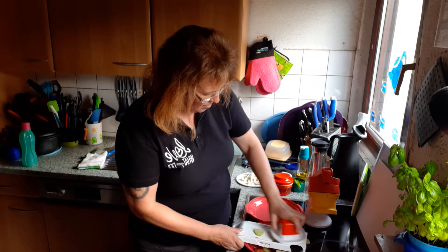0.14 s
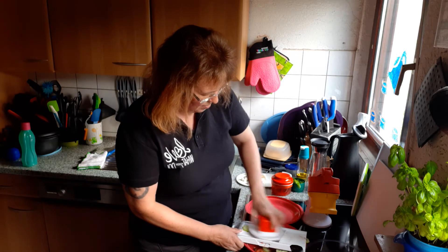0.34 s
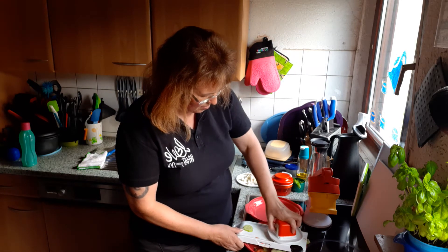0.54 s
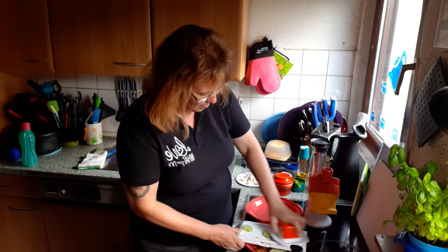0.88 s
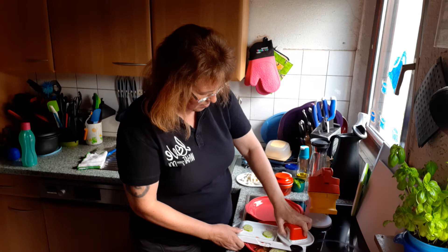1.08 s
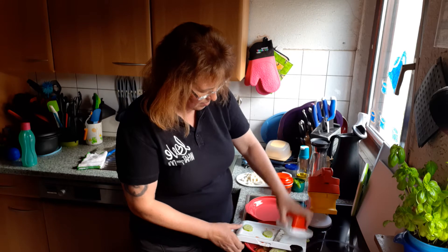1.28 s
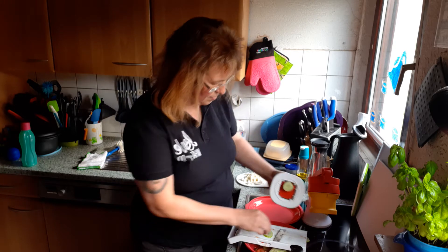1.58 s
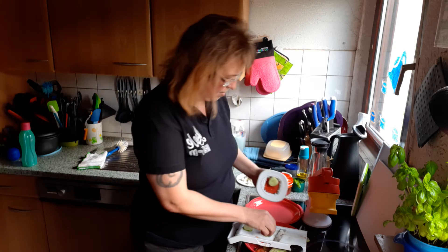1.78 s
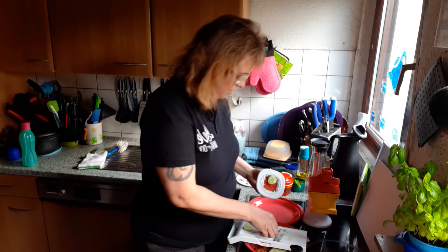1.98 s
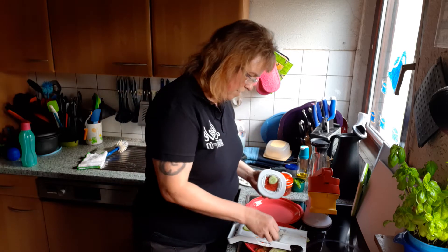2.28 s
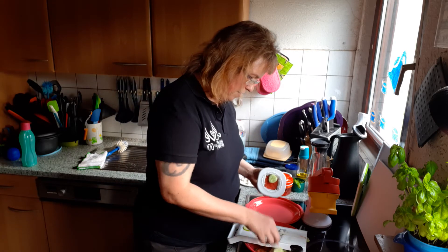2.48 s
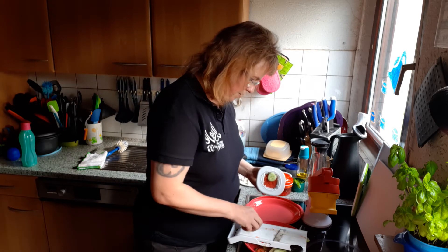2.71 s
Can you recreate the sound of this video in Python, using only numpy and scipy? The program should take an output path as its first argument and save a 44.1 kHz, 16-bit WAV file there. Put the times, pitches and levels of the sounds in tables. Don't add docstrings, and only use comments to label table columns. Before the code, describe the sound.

A vegetable in a plastic holder is pushed over a slicer in a burst of hard knocks, short scrapes and hollow worktop thumps, then scattered lighter clicks, close stereo in a small kitchen with faint low hum.

```python
import sys
import numpy as np
from scipy import signal
from scipy.fft import rfft, irfft, next_fast_len
from scipy.io import wavfile

SR = 44100
rng = np.random.default_rng(int(sys.argv[2]) if len(sys.argv) > 2 else 0)


def put_to_file(sound):
    columns = np.atleast_2d(sound).T
    safe = np.clip(columns, -1, 1)
    whole_steps = np.round(safe * 32767)
    wavfile.write(sys.argv[1], SR, whole_steps.astype(np.int16))


def how_loud(loudness_db):
    steps = np.asarray(loudness_db, float) / 20
    return 10 ** steps


N = 125685
T = np.arange(N) / SR
LEFT_RIGHT = np.array([[1], [-1]])

# [f/Hz, density/dB per Hz]; its level/dB
RUMBLE, RUMBLE_DB = [(25, -1.5), (48, -2.5), (110, -4), (160, -15), (230, -17), (400, -28), (1000, -56.5)], -68.5
# [f/Hz, density/dB per Hz]; its level/dB
HISS_COLOUR, HISS_DB = [(500, -11), (4300, -18.5), (8600, -26), (10100, -14), (10700, -8.5), (11400, 3),
                        (12100, -7.5), (15900, -12)], -75
# [f/Hz, level/dB]
WHINE_LINES = [(10928, -98.5), (10977, -102), (11224, -87.5), (11273, -87), (11321, -90), (11370, -91),
               (11466, -86.5), (11569, -91.5), (11617, -100)]
# [t/s, firing rate f/Hz, first, second, third order level/dB]
ENGINE_RUN = [(0.552, 62.19, -65, -72, -73.5), (.95, 62.34, -101, -61, -62.5),
              (1.22, 63.27, -77.5, -83, -69), (1.3, 63.92, -72.5, -72.5, -79.5),
              (1.403, 63.7, -78.5, -76.5, -68.5), (1.679, 64.35, -78.5, -80, -88),
              (2.029, 64.95, -72, -61, -81), (2.302, 66.38, -63, -63, -81.5), (2.409, 65.9, -84, -81, -80),
              (2.531, 66.5, -62.5, -74, -69), (2.599, 65.6, -63.5, -60, -96), (2.85, 64.8, -63, -53.5, -80)]
# [f/Hz, level when shaken/dB, t60/s, level when struck/dB]
WORKTOP_MODES = [(50.3, -3, 0.23, 0.5), (80.5, -4.5, 0.31, 0), (113, -7.5, 0.24, -6.5),
                 (150.6, -3.5, 0.19, 1.5), (219.8, -13, 0.36, -16.5), (259.8, -11.5, 0.13, -9),
                 (345.7, -7.5, 0.12, -5.5), (394, -11.5, 0.029, -20.5), (538, -17.5, 0.2, -13.5)]
# [f/Hz, level/dB, t60/s]
FRAME_MODES = [(820, -6.5, 0.08), (970.5, -1, 0.1), (1080, -0.5, 0.03), (1132, -3, 0.051),
               (1284, -1, 0.066), (1503, -6, 0.04), (1604, -11, 0.044), (1887, -4.5, 0.034),
               (2040, -7, 0.28), (2300, -31.5, .04), (2620, -20, 0.026)]
# [t/s, length/s, level/dB, f/Hz]
FINGER_THUDS = [
    (.124, 0.0083, -41, 152),
    (.141, 0.022, -41, 142),
    (0.331, 0.055, -42.5, 80.5),
    (.271, 0.011, -25.5, 147.6),
    (.2855, .008, -28, 141),
    (.3115, 0.0089, -28.5, 114.3),
    (.8375, 0.023, -42, 148.3),
    (2.4285, 0.025, -41, 146),
]
# [t/s, length/s, level/dB, f/Hz, t60/s]
HOLDER_CHATTERS = [(.0965, 0.0033, -50, 5890, 0.0078), (0.097, 0.025, -53, 853, 0.019),
                   (.125, 0.048, -52, 560, 0.011), (.2725, 0.023, -43, 577, 0.0074),
                   (.273, 0.0082, -43, 1914, 0.018), (0.41, 0.035, -52, 4000, .004),
                   (0.966, 0.16, -74, 5230, 0.0019), (1.177, .12, -82.5, 5000, 0.0027),
                   (1.452, 0.29, -88.5, 5430, 0.0015), (2.426, 0.055, -65.5, 346, 0.021),
                   (0.12, 0.016, -45.5, 1240, 0.032), (.149, 0.004, -43.5, 2240, 0.013),
                   (0.652, .09, -70.5, 1060, 0.047), (0.767, 0.026, -69.5, 2230, 0.0088),
                   (0.17, 0.0051, -51, 1160, 0.035), (0.237, 0.016, -37, 1164, 0.025),
                   (0.275, 0.014, -43.5, 963, 0.022), (.338, 0.006, -57, 1524, 0.048),
                   (0.398, .004, -57.5, 2070, 0.011), (0.846, 0.0055, -56, 1180, 0.013),
                   (0.886, 0.012, -57, 1026, 0.051), (1.131, 0.021, -67.5, 1626, 0.03),
                   (1.22, 0.038, -74.5, 996, .05), (1.726, 0.017, -60.5, 976, 0.064),
                   (1.725, 0.024, -73, 1530, 0.064), (1.767, 0.26, -74, 952, 0.31),
                   (1.911, 0.049, -72, 951, 0.078), (1.82, 0.0058, -70, 1980, 0.026),
                   (1.907, 0.046, -67, 1200, 0.025), (2.018, 0.013, -72.5, 920, 0.019),
                   (2.047, 0.012, -65, 897, 0.02), (2.05, 0.09, -85, 1490, 0.21),
                   (2.092, .015, -90, 950, 0.027), (2.428, 0.025, -64, 825, .03),
                   (2.433, 0.038, -69, 1430, 0.022), (2.442, 0.024, -68.5, 546, 0.026),
                   (2.724, 0.015, -50.5, 957, 0.02), (2.755, 0.0051, -71, 1910, 0.013),
                   (2.772, 0.023, -59.5, 940, 0.018)]
# [t/s, crack level/dB, frame level/dB, worktop level/dB, crack f/Hz]
HOLDER_KNOCKS = [(0.095, -53, -59, -45.5, 5800), (0.1213, -37, -36.5, -38, 2230),
                 (0.148, -34.5, -69, -40, 2200), (0.2336, -30, -48.5, -45, 1610),
                 (0.2708, -29.5, -29.5, -28, 4530), (0.286, -41, -43, -40, 4600),
                 (0.315, -50, -57, -44, 2420), (0.337, -44, -77, -59, 2130), (.432, -46, -66, -60.5, 4000),
                 (0.445, -43, -49.5, -57, 3940), (.466, -49, -63, -45, 3840),
                 (.8365, -39.5, -60, -42.5, 4170), (.886, -40, -49, -48, 4180),
                 (1.134, -47, -63, -60, 3750), (1.26, -61, -66.5, -81.5, 4000),
                 (1.721, -42, -54, -56.5, 4900), (1.821, -71, -55.5, -75, 2090),
                 (1.904, -44, -56.5, -61, 4630), (1.946, -72, -67, -56, 1980), (2.018, -53, -66, -67, 4200),
                 (2.0474, -45.5, -61, -57, 4300), (2.427, -48.5, -65, -42.5, 820),
                 (2.7283, -39, -45.5, -57.5, 10400), (2.76, -41, -67, -61.5, 4370)]
# [t/s, length/s, scrape level/dB, frame rattle level/dB, worktop push level/dB]
HOLDER_SLIDES = [(0.0, 0.013, -62.5, -76, -49.5), (0.087, 0.033, -55, -52, -46),
                 (0.122, 0.063, -47.5, -51.5, -35), (0.219, 0.015, -56.5, -59.5, -67),
                 (0.2335, 0.012, -52, -44.5, -55), (0.246, 0.035, -42, -45, -24),
                 (0.307, 0.064, -63, -75, -32.5), (0.395, 0.034, -52.5, -55, -42.5),
                 (0.423, 0.046, -51, -50, -40), (0.652, 0.094, -62, -65, -54),
                 (0.772, 0.023, -73, -65, -50.5), (0.806, 0.052, -64.5, -64, -53.5),
                 (0.828, 0.073, -52, -49.5, -43.5), (0.873, 0.058, -52.5, -57, -44.5),
                 (0.972, 0.14, -82.5, -99, -66), (1.141, 0.052, -71.5, -102, -87),
                 (1.727, 0.023, -54.5, -59, -47), (1.765, 0.073, -70, -66, -74),
                 (1.89, 0.039, -58, -59, -49), (2.048, 0.012, -71, -73, -60),
                 (2.723, 0.023, -60.5, -49.5, -57.5), (2.762, 0.019, -59.5, -59.5, -47)]
# [f/Hz, density/dB per Hz]
SCRAPE_COLOUR = [(240, -19.5), (400, -7.5), (653, -10), (1130, -1.5), (1740, -4.5), (2250, -3.5),
                 (2840, -5), (3910, -5.5), (15500, -13.5)]
# [f/Hz, left minus right level/dB]
MIC_TILT = [(60, -4.0), (180, -6), (550, -1.5), (1650, -2), (4970, -3.5), (15000, -6)]

ATTACK_SHARE, LONGEST_RISE_S, RELEASE_S = 0.37, 0.014, 0.011
JUDDER_DB, JUDDER_PER_S = 1.5, 87
GRAINS_PER_S, GRAIN_SPREAD_DB, RATTLES_PER_S = 9000, 3.5, 700
BRIGHT_HZ, DULLING = 5700, 0.49
CRACK_S, CRACK_WIDTH, CRACK_AIR_DB = 0.005, 0.16, -1
LONGEST_RING_CYCLES, CONTACT_HZ = 110, 311
PAIR_BEATS, PAIR_LEAN_DB = 1.31, 2
ROOM_T60_S, ROOM_DB, EARLY_S, EARLY_DB, WIDE_HZ, DULL_HZ = 0.24, -9.5, 0.012, -5.5, 530, 7000


def rms_one(x):
    return x / np.sqrt(np.mean(x ** 2) + 1e-20)


def colour(x, points):
    size = next_fast_len(x.shape[-1] + SR // 2)
    hz = np.maximum(np.arange(size // 2 + 1) * SR / size, 1)
    at, db = np.transpose(points)
    gain = how_loud(np.interp(np.log(hz), np.log(at), db))
    return irfft(rfft(x, size) * gain, size)[..., :x.shape[-1]]


def butter(x, order, hz, kind="low"):
    return signal.sosfilt(signal.butter(order, hz, kind, fs=SR, output="sos"), x)


def drift(rate):
    r = np.exp(-2 * np.pi * rate / SR)
    noise = rng.standard_normal(N + SR)
    return rms_one(signal.lfilter([1], [1, -2 * r, r * r], noise)[SR:])


def room_tone():
    low = rng.standard_normal(N) + 0.37 * rng.standard_normal((2, N))
    rumble = rms_one(colour(low, [(12, -63.5)] + RUMBLE + [(2500, -75.5)]))
    hiss = rms_one(colour(rng.standard_normal((2, N)), [(200, -49)] + HISS_COLOUR))
    return how_loud(RUMBLE_DB + 1.3 * drift(9)) * rumble + how_loud(HISS_DB + 3.0) * hiss


def whine():
    out = 0
    for hz, db in WHINE_LINES:
        level = np.sqrt(2) * how_loud(db + 1.7 * drift(2.7))
        out = out + level * np.sin(2 * np.pi * (hz * T + rng.random((2, 1))))
    return out


def engine():
    s, hz, *orders = np.transpose(ENGINE_RUN)
    turn = 2 * np.pi * np.cumsum(np.interp(T, s, hz) + 0.51 * drift(12)) / SR
    out = 0
    for k, db in enumerate(orders):
        level = np.sqrt(2) * how_loud(np.interp(T, s, db) + 2.8 * drift(20.0))
        out = out + level * np.sin((k + 1) * turn + k)
    return out


def kitchen(x):
    def stereo(mid, side):
        return butter(mid, 2, WIDE_HZ, "high") + butter(side, 2, WIDE_HZ, "high") * LEFT_RIGHT

    def unit(v):
        return v / np.sqrt(np.sum(v ** 2) / 2)

    t = T[:SR // 2]
    mid, side, early_mid, early_side = rng.standard_normal((4, len(t)))
    tail = butter(stereo(mid, side), 1, DULL_HZ) * how_loud(-60 * t / ROOM_T60_S) * (t > EARLY_S)
    early = stereo(early_mid, early_side) * np.exp(-t / EARLY_S)
    echo = how_loud(ROOM_DB) * unit(tail) + how_loud(EARLY_DB) * unit(early)
    return x + signal.fftconvolve(x, echo, axes=1)[:, :N]


def ring(x, hz, t60):
    r, w = how_loud(-60 / (t60 * SR)), 2 * np.pi * hz / SR
    return signal.lfilter([0, np.sin(w)], [1, -2 * r * np.cos(w), r * r], x + 1e-18)


def grains(rate):
    clicks = rng.random(N) < rate / SR
    size = how_loud(GRAIN_SPREAD_DB * np.minimum(rng.exponential(1, N), 4))
    return rms_one(clicks * size * rng.choice([-1, 1], N))


def knocked(start):
    return min(abs(start - row[0]) for row in HOLDER_KNOCKS) < 0.007


def shape(start, length):
    rise = min(ATTACK_SHARE * length, LONGEST_RISE_S)
    if knocked(start):
        rise = 0.002
        start = min((row[0] for row in HOLDER_KNOCKS), key=lambda s: abs(s - start))
    release = np.exp(-np.maximum(T - start - length, 0) / RELEASE_S)
    return np.clip((T - start) / rise, 0, 1) * release


def pressure(column, dulling=0):
    firm_db = max(row[column] for row in HOLDER_SLIDES) - 8
    push = 0
    for row in HOLDER_SLIDES:
        loss_db = 0 if knocked(row[0]) else dulling * min(row[column] - firm_db, 0)
        push = push + how_loud(row[column] + loss_db) * shape(row[0], row[1])
    return push * how_loud(JUDDER_DB * drift(JUDDER_PER_S))


def body(modes, knock_column, slide_column, rate, spread_db):
    shake = [grains(rate) for _ in range(3)]
    shaken = sum(how_loud(mode[1]) * ring(shake[k % 3], mode[0], mode[2]) for k, mode in enumerate(modes))
    scale = 1 / np.std(shaken)
    knocks = np.array(HOLDER_KNOCKS)
    at = (knocks[:, 0] * SR).astype(int)
    luck = rng.normal(0, 1, (len(knocks), len(modes)))
    push, out = pressure(slide_column), 0
    for k, (hz, db, t60, *struck) in enumerate(modes):
        struck_db = struck[0] if struck else db
        force = scale * push * shake[k % 3] * how_loud(db)
        force[at] += (-1) ** k * how_loud(knocks[:, knock_column] + spread_db * luck[:, k] + struck_db)
        out = out + ring(force, hz, min(t60, LONGEST_RING_CYCLES / hz))
    return out / 2


def worktop():
    return butter(body(WORKTOP_MODES, 3, 4, rate=200.0, spread_db=5.5), 1, CONTACT_HZ)


def frame():
    return body(FRAME_MODES, 2, 3, rate=RATTLES_PER_S, spread_db=1.5)


def thuds():
    return sum(how_loud(db) * shape(s, length) * np.sin(2 * np.pi * hz * (T - s))
               for s, length, db, hz in FINGER_THUDS)


def chatter():
    rattle, out = grains(2 * RATTLES_PER_S), 0
    lean = how_loud(PAIR_LEAN_DB * LEFT_RIGHT)
    for s, length, db, hz, t60 in HOLDER_CHATTERS:
        lower = ring(rattle, hz - PAIR_BEATS / t60, t60)
        upper = ring(rattle, hz + PAIR_BEATS / t60, t60)
        pair = lean * lower - upper / lean
        during = pair[:, int(s * SR):int((s + length + RELEASE_S) * SR)]
        out = out + how_loud(db) * shape(s, length) * pair / np.std(during)
    return out


def cracks():
    out, t = np.zeros((2, N + SR)), T[:4096]
    for s, db, _, _, hz in HOLDER_KNOCKS:
        mid, side = rng.standard_normal((2, len(t)))
        puff = mid + side * LEFT_RIGHT
        patch = butter(puff, 1, [hz * (1 - CRACK_WIDTH / 2), hz * (1 + CRACK_WIDTH / 2)], "band")
        broad = butter(puff, 3, [hz / 4, min(1.51 * hz, 0.45 * SR)], "band")
        sound = rms_one(patch) + how_loud(CRACK_AIR_DB) * rms_one(broad)
        fade = np.minimum(t / 0.0013, 1) * np.exp(-t / CRACK_S * np.sqrt(hz / 4000))
        first = int(s * SR)
        out[:, first:first + len(t)] += how_loud(db) * sound * fade / 2
    return out[:, :N]


def scrape():
    mid, side = (rms_one(colour(grains(GRAINS_PER_S), [(100, -52)] + SCRAPE_COLOUR)) for _ in range(2))
    both = mid + side * LEFT_RIGHT
    low, high = butter(both, 5, BRIGHT_HZ), butter(both, 5, BRIGHT_HZ, "high")
    return pressure(2) * low + pressure(2, DULLING) * high


def scene():
    background = room_tone() + whine() + engine()
    near = worktop() + frame() + thuds() + chatter() + cracks() + scrape()
    return background + kitchen(near)


def top_cut(x):
    return signal.sosfilt(signal.butter(12, 16460, fs=SR, output="sos"), x)


def record(dry):
    left = colour(dry[0], [(hz, db / 2) for hz, db in MIC_TILT])
    right = colour(dry[1], [(hz, -db / 2) for hz, db in MIC_TILT])
    x = butter(np.array([left, right]), 6, 44, "high")
    x = signal.sosfilt(signal.cheby2(20, 50, 15900, fs=SR, output="sos"), x)
    return top_cut(x)


dry = scene()
out = record(dry)
put_to_file(out)
```